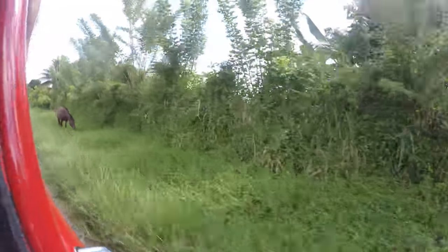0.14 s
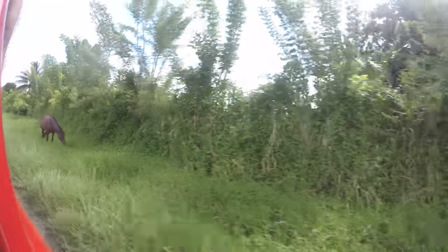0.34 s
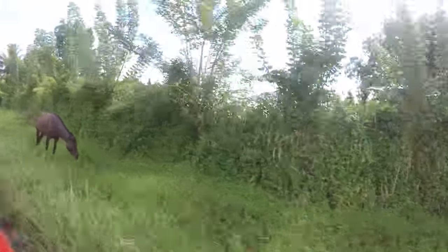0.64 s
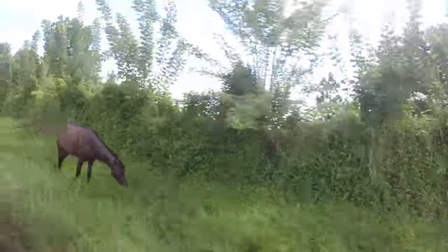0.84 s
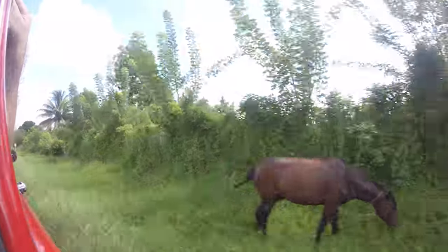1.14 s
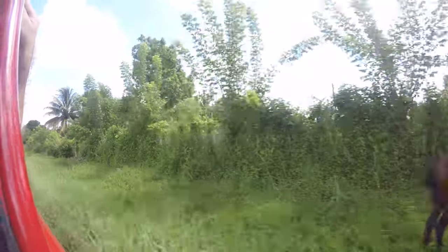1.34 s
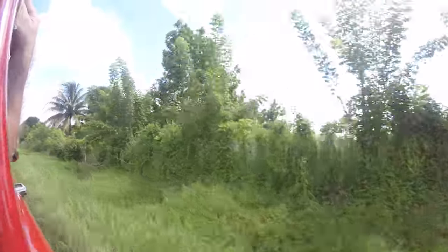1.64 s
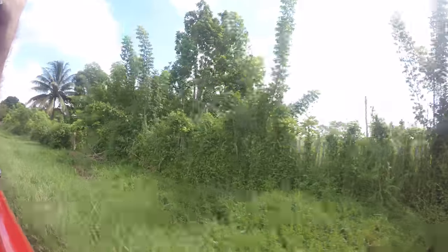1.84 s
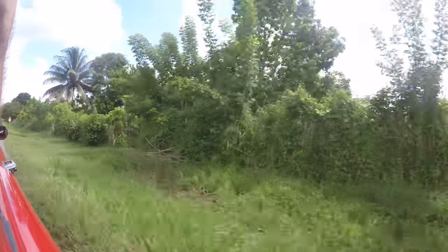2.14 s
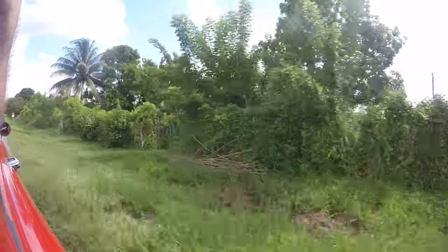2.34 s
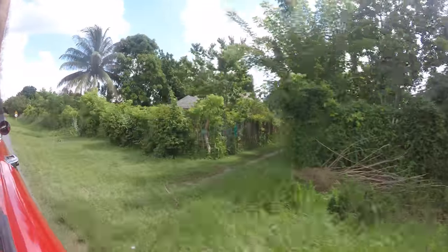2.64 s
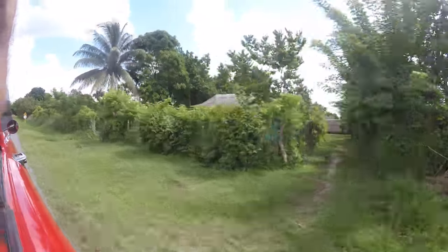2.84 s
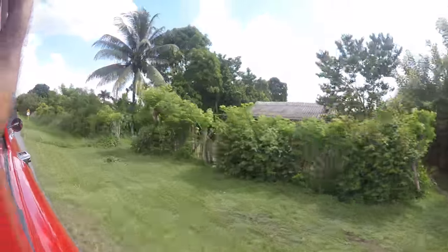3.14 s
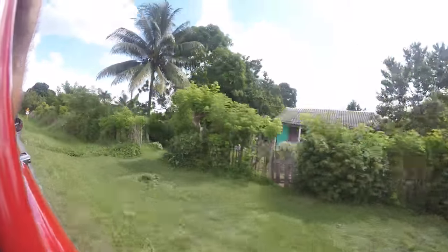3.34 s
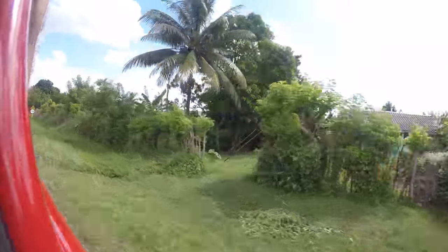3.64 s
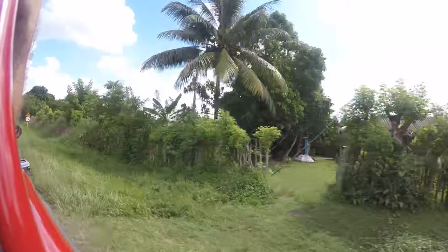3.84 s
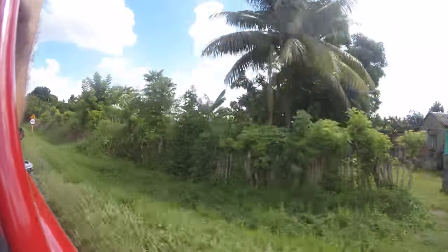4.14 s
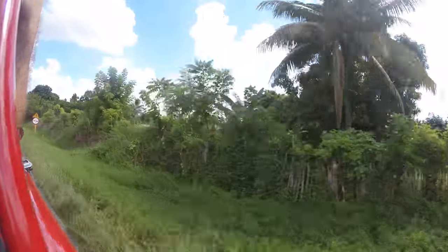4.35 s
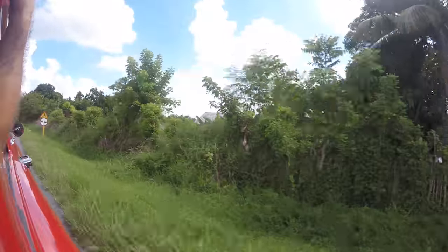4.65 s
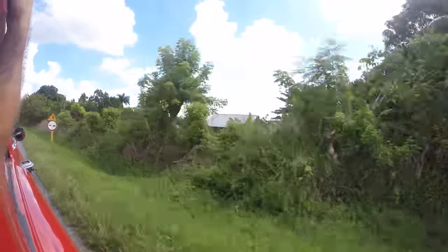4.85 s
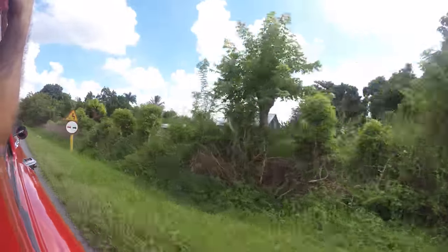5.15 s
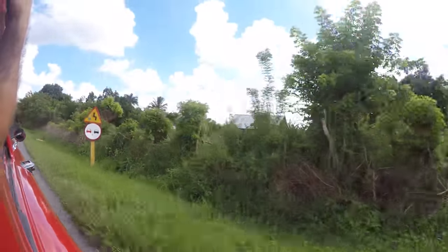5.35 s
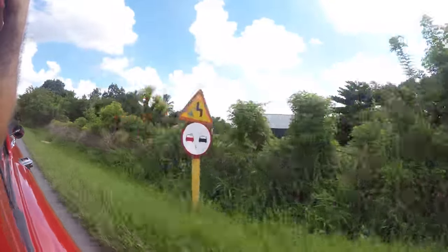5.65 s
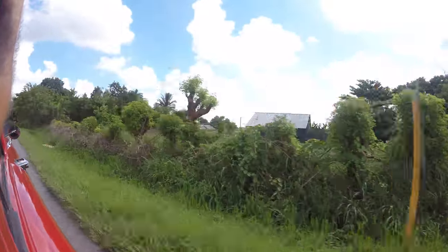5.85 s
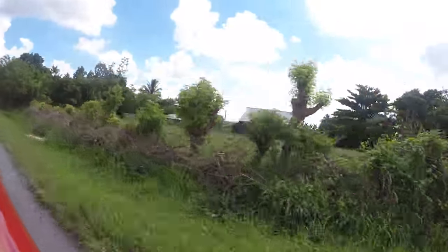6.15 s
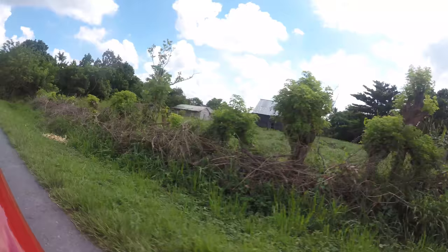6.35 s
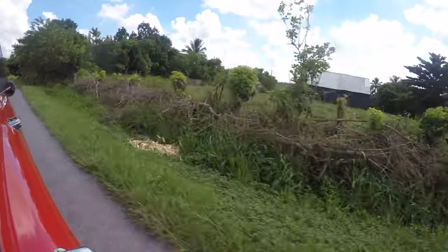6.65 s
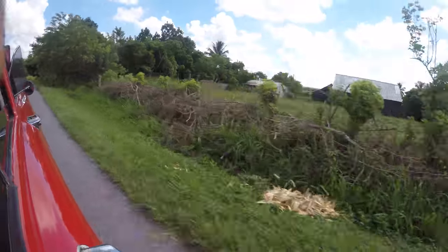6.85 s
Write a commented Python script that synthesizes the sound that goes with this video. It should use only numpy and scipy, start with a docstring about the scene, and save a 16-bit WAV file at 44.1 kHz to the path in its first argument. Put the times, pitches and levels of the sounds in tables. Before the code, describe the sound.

Close, distorted wind roar on a small camera outside a moving car: low buffeting, papery flaps and blunt pops in irregular clusters. An early sharp crack momentarily pushes everything down. Breathy air swishes and thin tyre hiss sit behind, with a low engine hum climbing gradually in pitch and light dry ticks from loose parts. The middle is steadier; the last two seconds turn rough and fluttery again. Open air, no echo.

```python
"""On a country road, a camera is held out of the window of a car that slowly gathers speed.
Turbulent airflow rumbles and flutters on the microphone as shaped noise; eddies burst in sharp puffs,
and one hard slap cracks, rings the housing and makes the limiter duck. Breathy swishes and two brief, faint
bursts near 9 kHz are bands of noise. Below, the engine drones upward as a harmonic tone,
the tyres hiss along the verge as noise and the bodywork ticks now and then as decaying noise."""
import sys
import numpy as np
from scipy import signal
from scipy.fft import rfft, irfft, next_fast_len
from scipy.io import wavfile
from scipy.ndimage import uniform_filter1d, minimum_filter1d, map_coordinates

SR = 44100
rng = np.random.default_rng(int(sys.argv[2]) if len(sys.argv) > 2 else 0)


def generate_wav(signal):
    """Clip the signal to [-1, 1] and save it as 16-bit WAV at the path in sys.argv[1]."""
    frames = np.transpose(np.atleast_2d(signal))
    scaled = np.clip(frames, -1, 1) * 32767
    pcm = np.round(scaled).astype(np.int16)
    wavfile.write(sys.argv[1], SR, pcm)


N = 308778
TIME = np.arange(N) / SR

# gusts that set the air fluttering: centre t/s, width t/s, rise level/dB
GUST_BUMPS = [(.68, 0.32, 3), (1.05, 0.083, 4.5), (1.42, 0.21, 3.5), (1.87, 0.1, 5.5), (2.6, 0.25, 1),
              (4.64, 0.073, 8), (4.97, 0.049, 4.5), (5.26, 0.051, 5), (6.3, 0.4, 6.5), (6.9, 0.18, 0)]
# spectrum of the small fluttering eddies: f/Hz, relative level/dB
FLUTTER_SPECTRUM = [(200, -27.5), (450, 4), (700, 2), (1100, -1.5), (1600, -8), (2500, -17.5), (3300, -22),
                    (4000, -34), (6000, -47.5), (10000, -72.5)]


def amp(db):
    """Convert level to amplitude ratio: 20 dB is a factor of ten."""
    return 10 ** (np.asarray(db) / 20)


def unit(x):
    """Normalise the mean-square power, giving rms 1."""
    return x / np.sqrt(np.mean(x ** 2) + 1e-20)


def curves(rows):
    """Linear interpolation in time of each column after the first."""
    s, *columns = np.transpose(rows)
    return [np.interp(TIME, s, column) for column in columns]


def bumps(rows):
    """Superpose Gaussian level changes in dB from rows of centre, width and height."""
    return sum(db * np.exp(-.5 * ((TIME - s) / width) ** 2) for s, width, db in rows)


def wobble(rate):
    """Random modulation: a smooth spline through random knots, rate of them a second."""
    return map_coordinates(rng.standard_normal(N // 16), [TIME * rate + 2], mode="wrap")


def filtered(x, response):
    """Linear filtering: multiply the spectrum by a response of frequency."""
    size = next_fast_len(N + 8192)
    spectrum = rfft(x, size) * response(np.fft.rfftfreq(size, 1 / SR))
    return irfft(spectrum, size)[:N]


def noise(spectrum):
    """Spectral shaping: white noise takes the colour of (f/Hz, level/dB) rows, at rms 1."""
    f, db = np.transpose(spectrum)

    def colour(hz):
        # all but closed above the last point
        return amp(np.interp(np.log(hz + 1), np.log(f), db, right=-120))

    return unit(filtered(rng.standard_normal(N), colour))


def steadied(x, span):
    """Divide by the running rms, which evens out swells slower than span seconds."""
    size = max(int(span * SR), 3)
    power = uniform_filter1d(uniform_filter1d(x ** 2, size), size)
    return x / np.sqrt(np.abs(power) + 1e-9)


def wind():
    """Turbulent cascade: large eddies rumble and carry smaller ones, which come in bursts."""
    # steady airflow: t/s, rumble level/dB, buffet level/dB
    airflow = [(0, -19, -22.5), (.4, -13, -23.5), (.85, -16.5, -23.5), (1.1, -13, -20), (1.5, -14, -17.5),
               (1.8, -17.5, -23), (2.15, -17, -19), (2.5, -13.5, -20), (3, -15, -18.5), (3.7, -13.5, -20),
               (4.5, -13.5, -21.5), (5, -14.5, -20.5), (6.25, -14, -18.5), (6.65, -14.5, -21.5),
               (7, -10.5, -17)]
    # spectra of the largest and the middling eddies: f/Hz, relative level/dB
    rumble_spectrum = [(12, -24.5), (25, -7.5), (42, -5), (60, 0), (95, 0.5), (125, -0.5), (160, -9.5),
                       (230, -20), (450, -44), (1200, -85)]
    buffet_spectrum = [(60, -29.5), (120, -3), (170, 0.5), (250, 0.5), (350, -5.5), (500, -11), (800, -19),
                       (1600, -45), (4000, -60)]
    # a large eddy leans on the port: centre t/s, width t/s, rise level/dB (negative: a dip)
    heaves = [(1.07, 0.022, -1), (1.49, 0.03, -2.5), (2.2, 0.048, -1.5), (3.16, 0.016, 2.5),
              (3.66, .016, 1.5), (4.13, 0.028, 0.5), (5.01, 0.019, 3), (5.28, 0.026, 0.5),
              (6.45, 0.014, 2.5), (6.71, .02, -1.5)]
    # the airflow lets go of the port: centre t/s, width t/s, depth level/dB (negative: a rise)
    lulls = [(.102, .027, 3.5), (.64, 0.0087, 9), (1.285, 0.014, 6.5), (1.589, 0.022, 4), (1.82, 0.018, 4),
             (1.991, 0.0094, 10), (2.274, 0.017, 4.5), (3.205, .014, 0.5), (3.62, .012, -1),
             (4.18, 0.01, 5), (4.442, .014, 0.5), (4.89, 0.012, 2.5), (5.068, 0.014, 4),
             (5.389, 0.017, 6.5), (5.688, .012, 5), (6.52, 0.018, 4), (6.652, 0.019, 5)]
    flutter_db = -31  # between gusts

    rumble_db, buffet_db = curves(airflow)
    surges, eddies = wobble(22), wobble(70)
    rumble = steadied(noise(rumble_spectrum), span=0.056) * amp(0.37 * wobble(17))

    # shared surges and eddies make buffet and flutter burst together
    buffet_bursts = amp(2.3 * surges + 2.97 * eddies + 1.54 * wobble(130))
    buffet = steadied(noise(buffet_spectrum) * buffet_bursts, span=0.095)
    flutter_bursts = amp(2.0 * surges + 2.0 * eddies + 2.4 * wobble(260))
    flutter = steadied(noise(FLUTTER_SPECTRUM) * flutter_bursts, span=.13)

    swell = wobble(9)
    heavy = amp(rumble_db + 0.04) * rumble + amp(buffet_db + 1.5 + swell) * buffet
    heavy *= amp(bumps(heaves) - bumps(lulls))
    return heavy + amp(flutter_db + bumps(GUST_BUMPS) + 1.5 * swell) * flutter


def puffs(waver_octaves=0.3627, build=0.77, collapse=0.75, push_db=-1.0, push_cycles=0.31):
    """Eddy impact: a broad push on the port, a few uneven pressure cycles and a spit of turbulence."""
    # strongest eddies, big ones thudding and small ones flapping:
    # t/s, level/dB, mean pitch f/Hz, time scale t/s, spit level/dB relative to the burst before a lift
    strong_eddies = [(0.057, -11.5, 857, 0.0038, -20.0), (0.071, -17, 900, 0.003, -11),
                     (0.332, -12, 1240, 0.008, -12), (0.357, -19, 750, 0.004, -15),
                     (0.474, -17, 760, 0.003, -12), (0.508, -10, 850, 0.0023, -14),
                     (0.534, -8.5, 901, 0.0024, -16), (0.568, -8, 740, 0.0025, -25.0),
                     (0.603, -12, 900.0, 0.006, -13), (0.664, -11, 850.0, 0.0021, -23),
                     (0.678, -10, 910.0, 0.003, -18), (0.699, -12.5, 1005, 0.0026, -12),
                     (0.716, -10, 940.0, 0.0055, -17), (0.734, -6.5, 700, 0.0041, -20),
                     (0.845, -15, 1010.0, 0.017, -21), (0.956, -16.5, 700, 0.005, -18),
                     (0.977, -9.0, 291, 0.0056, -29), (1.07, -12, 1150, 0.012, -10.5),
                     (1.157, -10, 760.0, 0.0032, -21), (1.322, -14.5, 620, 0.006, -28),
                     (1.439, -15, 680, 0.003, -16), (1.482, -6, 199, 0.0071, -24),
                     (1.665, -12, 700, 0.0035, -19), (1.675, -5, 560, 0.0068, -12),
                     (1.693, -14, 1400, 0.0014, -7), (1.74, -10, 859, 0.006, -12.5),
                     (1.796, -17, 800, 0.0025, -12), (1.818, -13, 950, 0.0055, -16),
                     (1.828, -12, 1200, 0.004, -9), (1.837, -14, 750, 0.0025, -18),
                     (1.845, -8.5, 696, 0.0032, -27), (1.854, -6, 850, 0.0034, -17.5),
                     (1.881, -9.5, 820, 0.0031, -17.5), (1.914, -16, 720, 0.0025, -19),
                     (1.937, -16.5, 900, 0.007, -14), (1.968, -15.5, 780, 0.003, -14),
                     (2.012, -20.5, 995, 0.0025, -2), (2.042, -18.5, 1250, 0.0041, -6.5),
                     (2.05, -19, 1900, 0.003, -15), (2.195, -5.5, 220.6, 0.0076, -30.0),
                     (2.368, -12, 640, 0.003, -23), (2.372, -7.0, 242.4, 0.005, -36),
                     (2.739, -18, 1400, 0.0021, -0.5), (2.982, -13.5, 700, 0.0027, -13),
                     (3.062, -4, 269, 0.0056, -29), (3.167, -14, 676, 0.0025, -17),
                     (3.675, -14.5, 1000, 0.0078, -8.5), (3.691, -13.5, 1090.0, 0.0063, -16),
                     (3.899, -7.5, 480, 0.0062, -24), (4.12, -12.5, 279.5, 0.023, -25),
                     (4.51, -15.5, 779, 0.011, -11), (4.622, -12, 592, 0.0036, -26),
                     (4.678, -14, 736, 0.0092, -15), (4.68, -9, 231.7, 0.013, -34),
                     (4.773, -8.5, 700, 0.0023, -29), (4.935, -14, 650, 0.003, -24),
                     (4.948, -7, 660, 0.003, -29), (4.953, -3, 293, 0.0055, -34),
                     (4.961, -7, 660, 0.0025, -30), (4.997, -2.5, 234.6, 0.0083, -37),
                     (5.091, -7, 290.0, 0.0058, -32), (5.111, -13, 700, 0.0025, -21),
                     (5.19, -15, 800, 0.004, -13), (5.237, -11, 960.0, 0.0066, -12.5),
                     (5.259, -14, 1110.0, 0.0054, -18), (5.279, -13.5, 950, 0.0033, -14),
                     (5.291, -21, 750, 0.003, -19), (5.293, -3, 223.2, 0.0083, -25),
                     (5.323, -16, 810.0, 0.003, -13), (5.954, -17, 1300, 0.0043, -4.5),
                     (5.988, -9, 1070, 0.0027, -13.5), (6.046, -5.5, 350, 0.0043, -23),
                     (6.102, -11.5, 830.0, 0.0024, -12), (6.112, -12, 950, 0.0051, -13.5),
                     (6.126, -11, 1201, 0.0072, -14), (6.17, -6, 256.3, 0.012, -36),
                     (6.231, -8.5, 930, 0.0016, -12), (6.273, -13, 760, 0.0027, -18),
                     (6.287, -17, 850, 0.003, -16), (6.31, -14, 850, 0.003, -18),
                     (6.323, -18, 1100, 0.0055, -8), (6.339, -11.5, 955, 0.0053, -19),
                     (6.364, -11.5, 680.0, 0.0096, -15), (6.405, -6, 700.0, 0.0031, -18),
                     (6.442, -15.5, 720, 0.003, -17), (6.479, -15, 850, 0.0037, -14),
                     (6.489, -18, 1000, 0.007, -8.5), (6.505, -17, 1200, 0.006, -14),
                     (6.554, -16, 850, 0.008, -14), (6.6, -17, 1209, 0.0026, -5.5),
                     (6.688, -9, 800, 0.0023, -11.5), (6.825, -14.5, 757, 0.014, -16.5),
                     (6.972, -8, 700, 0.0028, -18), (6.979, -7.5, 270.7, 0.0039, -28)]
    # spectrum of the ragged spit: f/Hz, relative level/dB
    spit_spectrum = [(300, -6.5), (900, -3), (1600, 6), (2400, 0.5), (3200, -6.5), (3900, -20),
                     (6500, -43.5), (10000, -62.5)]

    out = np.zeros(N)
    ragged, drift = noise(spit_spectrum), rng.standard_normal(N)
    for s, db, hz, width, spit_db in np.vstack([strong_eddies, lesser_eddies()]):
        near = slice(max(int((s - .05) * SR), 0), int((s + .05) * SR))
        t = TIME[near] - s
        side_width = width * np.where(t < 0, build, collapse)
        swell = np.exp(-np.abs(t / side_width) ** 1.06)
        # no two cycles are equally long, so the burst has no clear pitch
        waver = waver_octaves * map_coordinates(drift[near], [hz * (t - t[0])], mode="mirror")
        cycles = np.sin(2 * np.pi * np.cumsum(hz * 2 ** waver) / SR)
        swing = t * hz / push_cycles
        push = amp(push_db) * swing * np.exp(-.5 * swing ** 2)
        burst = amp(-1.0) * cycles + amp(spit_db + 2.0) * ragged[near]
        out[near] += amp(db) * (push + swell * burst)
    return out


def lesser_eddies(count=160):
    """Random arrivals, denser in gusts, in the columns of the strong eddies; lower-pitched ones are stronger."""
    eddies_per_s = 5  # before the gusts raise it
    middle_hz, spread_octaves, middle_width_s = 378.3, .55, 0.0044
    middle_db, db_per_octave = -18, -6
    spit_db, spit_db_per_octave = -30.5, 5.5  # smaller eddies spit more

    place, chance = rng.random((2, count))
    size, strength, length = rng.standard_normal((3, count))
    s = (np.arange(count) + place) / count * TIME[-1]
    rate = eddies_per_s * amp(np.interp(s, TIME, bumps(GUST_BUMPS)))
    octaves = spread_octaves * np.clip(size, -2, 2)
    rows = np.transpose([
        s,
        middle_db + db_per_octave * octaves + strength,
        middle_hz * 2 ** octaves,
        middle_width_s * np.exp(0.38 * length),
        spit_db + spit_db_per_octave * octaves,
    ])
    return rows[chance < rate * TIME[-1] / count]


def slap(thump_width=0.005, build_s=0.0089, tear_db=-13, snap_s=0.00098):
    """Impulsive excitation: a gust builds roughly, cracks, rings the housing and swings the pressure."""
    # spectrum of the crack: f/Hz, relative level/dB
    crack_spectrum = [(100, 6.5), (400, 12.5), (800, -0.5), (1300, 1.5), (2800, -6), (4200, -19),
                      (5300, -16.5), (6500, -32), (7600, -35), (8900, -29), (10000, -42), (13000, -45)]
    # resonances of the camera's housing: f/Hz, level/dB, 60 dB decay t/s
    housing = [(3250, -24.5, 0.016), (5200, -21.5, 0.012), (6650, -35.5, 0.0092)]
    slap_s = 1.6843
    crack_db, thump_db, thump_hz = -0.5, 5, 151

    t = TIME - slap_s
    after = np.maximum(t, 0)
    crack = amp(crack_db) * noise(crack_spectrum) * np.exp(-.5 * (t / snap_s) ** 2)
    ring = sum(amp(db - 60 * after / t60) * np.sin(2 * np.pi * hz * after) for hz, db, t60 in housing)
    tear_swell = np.exp(-np.abs(t) / np.where(t < 0, build_s, .003))
    tear = amp(tear_db) * tear_swell * noise(FLUTTER_SPECTRUM)
    age = after / thump_width
    thump = amp(thump_db) * np.sin(2 * np.pi * thump_hz * t) * age * np.exp(1 - age)
    return tear + crack + ring + thump


def treble_bursts():
    """Band-limited noise under two-sided exponential envelopes: two brief, faint bands near 9 kHz."""
    # spectrum of the band: f/Hz, relative level/dB
    band_spectrum = [(7000, -46), (8200, -9), (9000, -1), (9400, -6), (10000, -32)]
    # bursts: peak t/s, level/dB, time constant t/s
    bursts = [(1.681, -46.5, 0.01), (5.953, -52, 0.0046)]
    envelope = sum(amp(db) * np.exp(-np.abs(TIME - s) / width) for s, db, width in bursts)
    return noise(band_spectrum) * envelope


def swishes():
    """Broad resonance: air sings past the window frame as band-filtered noise that swells and fades."""
    # resonances: centre t/s, width t/s, centre f/Hz, bandwidth f/Hz, level/dB
    frame_tones = [(.2, 0.39, 2350, 614, -37), (0.299, 1, 690, 138, -36.5), (1.93, 0.2, 603, 183, -29),
                   (2.06, 0.17, 1870, 800, -32.5), (2.9, 0.46, 683, 148, -33.5)]
    out = np.zeros(N)
    for s, width, centre, band, db in frame_tones:
        hiss = rng.standard_normal(N)
        air = unit(filtered(hiss, lambda hz: 1 / (1 + (2 * (hz - centre) / band) ** 4)))
        out += amp(db) * air * np.exp(-.5 * ((TIME - s) / width) ** 2)
    return out


def engine(octave_db=-4, fade_db_per_hz=0.35, wander_hz=1.202):
    """Harmonic series of the firing rate; its octave fades as it climbs out of the cabin's boom."""
    # the rate climbs ever more slowly toward its top
    start_hz, final_hz, climb_s = 59.43, 125.84, 13.4
    level_db = -18.5

    hz = final_hz - (final_hz - start_hz) * np.exp(-TIME / climb_s)
    phase = 2 * np.pi * np.cumsum(hz + wander_hz * wobble(8)) / SR
    octave = amp(octave_db - fade_db_per_hz * (hz - hz[0]))
    tone = np.sin(phase) + octave * np.sin(2 * phase) + amp(-24.0) * np.sin(3 * phase)
    return amp(level_db + 0.87 * wobble(4.7)) * unit(tone)


def road():
    """Broadband friction and flow noise of tyres and air, brighter where the verge throws it back."""
    # tyres and passing air: t/s, rush level/dB, hiss level/dB (both lifted below)
    passing = [(0.0, -32.5, -46.5), (0.45, -32, -45), (0.74, -33.5, -45.5), (1.23, -34.5, -51),
               (1.62, -29.5, -52), (1.72, -35, -56), (1.87, -36.5, -50.5), (2.13, -36.5, -45.5),
               (2.38, -33.5, -49.5), (3.25, -33.5, -54.5), (4.74, -34.5, -53.5), (5.65, -35.5, -54.5),
               (6.04, -34.5, -53), (6.38, -35, -54.5), (6.67, -41.5, -59), (7.0, -33.5, -57.5)]
    # spectra of the two bands: f/Hz, relative level/dB
    rush_spectrum = [(200, -12), (450, -9.5), (700, 5), (1000, 1), (1500, 3.5), (2100, -3), (2550, -2.5),
                     (2950, -10.5), (3400, -11), (4000, -19), (6000, -44.5), (9000, -64)]
    hiss_spectrum = [(1500, -18), (3000, 2), (4500, -1), (5300, -5), (6400, -10), (7400, -18.5),
                     (8400, -17.5), (10000, -26.5), (13000, -41), (15000, -67)]

    rush_db, hiss_db = curves(passing)
    rush = amp(rush_db + 2.5 + 1.1 * wobble(25)) * noise(rush_spectrum)
    hiss = amp(hiss_db + 1.5 + 1.3 * wobble(40)) * noise(hiss_spectrum)
    return rush + hiss


def ticks(t60=0.036, snap_t60=0.026, rate=14, faint_db=-46, faint_snap_db=-8):
    """Damped impact response: knocks of loose parts, dull or snapping, as decaying noise."""
    # knocks: t/s, level/dB before a common cut, bright snap level/dB relative to the knock
    loose_parts = [(0.9316, -22.5, -11), (2.304, -31, -15), (2.407, -30, -9), (2.452, -28, -8),
                   (2.632, -31.5, -3), (2.804, -22.5, 0.5), (2.975, -34.5, -11), (3.239, -32, -19),
                   (3.255, -30, -14), (3.533, -33, -10), (3.624, -35, -11), (3.677, -35, -3),
                   (3.717, -29, -12), (3.8575, -24.5, -19), (3.884, -31, -12), (4.0, -33, -15),
                   (4.02, -28.5, -11), (4.035, -37, -7), (4.113, -31, -10), (4.235, -33, -9),
                   (4.365, -31.5, -14), (4.492, -34, -8), (4.508, -33, -4), (4.659, -28, -11),
                   (4.906, -29, -15), (5.016, -27, -15), (5.226, -28.5, -13), (5.449, -35, -4),
                   (5.5575, -21.5, -15.5), (5.687, -32, -6), (6.361, -24, -13.5), (6.386, -28, -15),
                   (6.721, -35.5, -13)]
    # spectra of the dull knock and the bright snap: f/Hz, relative level/dB
    dull_spectrum = [(1500, -28), (3000, -6.5), (3700, 6.5), (4800, -3.5), (6200, -16.5), (7400, -25),
                     (9500, -37), (13000, -51)]
    snap_spectrum = [(3500, -16.5), (5000, 2.5), (6200, 2), (7000, -8.5), (7700, -15.5), (9500, -20.5),
                     (11000, -34.5), (13000, -46)]

    # a rough stretch of road scatters fainter knocks, rate of them a second
    rough = (TIME > 2.2) & (TIME < 6.5)
    struck = rng.random(N) < rate / SR
    knocks = rough * struck * amp(faint_db + 2.2 * rng.standard_normal(N))
    snaps = knocks * amp(faint_snap_db)
    for s, db, snap_db in loose_parts:
        at = round(s * SR)
        knocks[at] = amp(db - 7.5)
        snaps[at] = knocks[at] * amp(snap_db)

    t = np.arange(SR // 4) / SR

    def rung(strokes, life):
        decay = amp(-60 * t / life) * (1 - np.exp(-t / 0.00036))
        return signal.fftconvolve(strokes, decay)[:N]

    return rung(knocks, t60) * noise(dull_spectrum) + rung(snaps, snap_t60) * noise(snap_spectrum)


def limiter(x, ceiling_db=-1.0, recovery_db=170):
    """Gain reduction: peaks push the gain down; it holds, then recovers at recovery_db a second."""
    hold_s = 0.02
    over = np.maximum(20 * np.log10(np.abs(x) + 1e-9) - ceiling_db, 0)
    half = int(hold_s * SR / 2)
    held = -minimum_filter1d(-over, 2 * half + 1, origin=half)
    cut = np.maximum.accumulate(held + recovery_db * TIME) - recovery_db * TIME
    return x * amp(-uniform_filter1d(cut, size=90))


def scene():
    """Superposition: all sounds add at one microphone."""
    air = wind() + puffs() + slap() + treble_bursts() + swishes()
    car = engine() + road() + ticks()
    return (air + car)[None]


def record(dry):
    """Compression, saturation and band limiting: the camera limits, rounds off overshoots and cuts the top."""
    top_hz = 15100
    x = limiter(amp(0.65) * dry[0])
    x = x / (1 + np.abs(x) ** 10) ** (1 / 10)
    return filtered(x, lambda hz: hz < top_hz)[None]


dry = scene()
out = record(dry)
generate_wav(out)
```